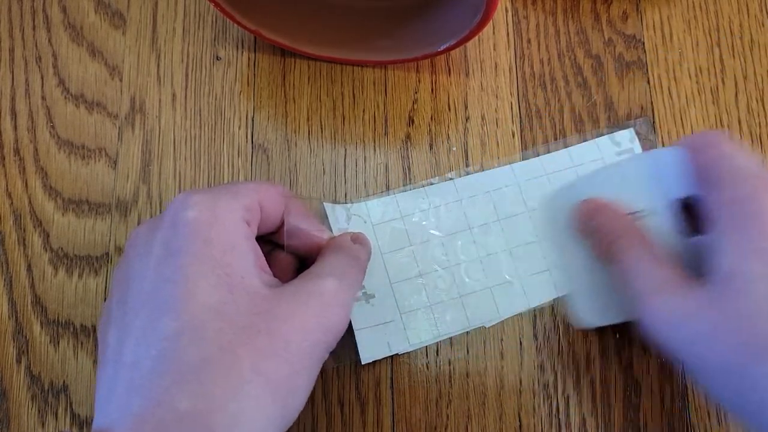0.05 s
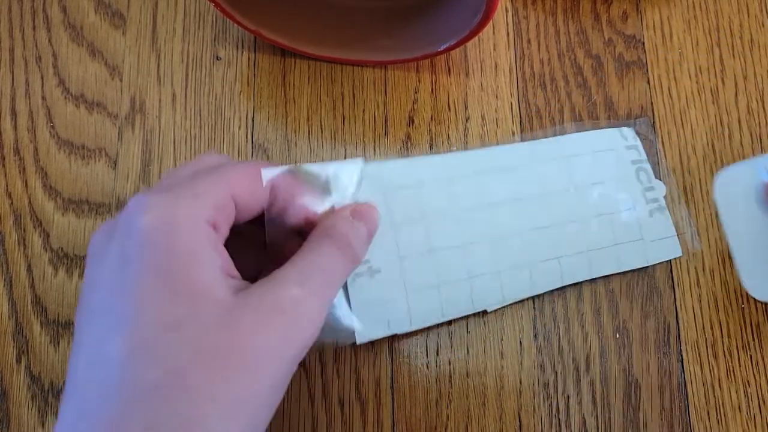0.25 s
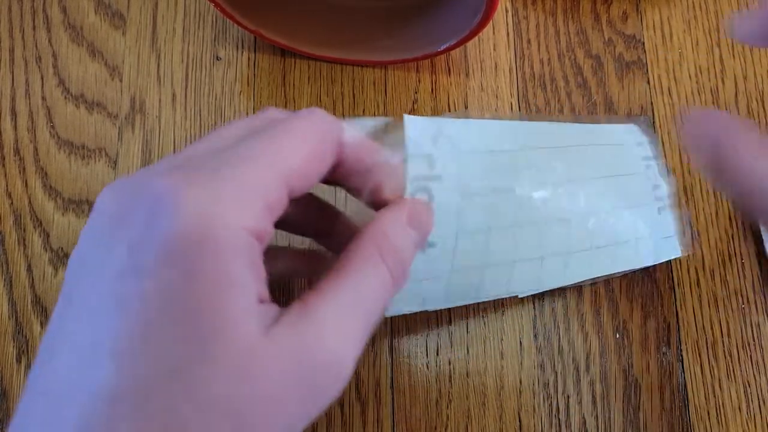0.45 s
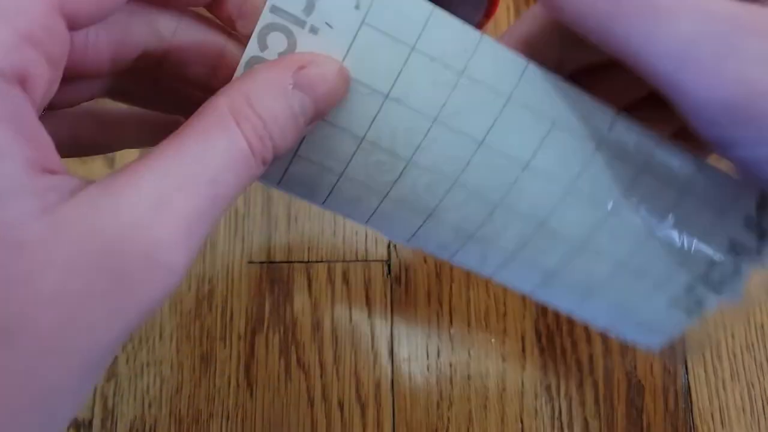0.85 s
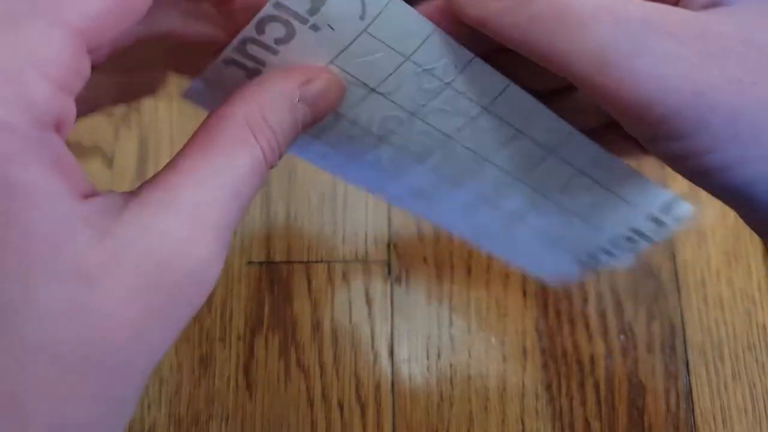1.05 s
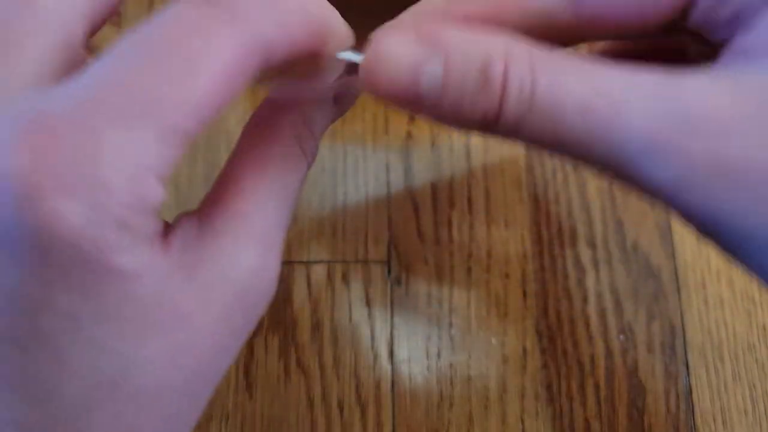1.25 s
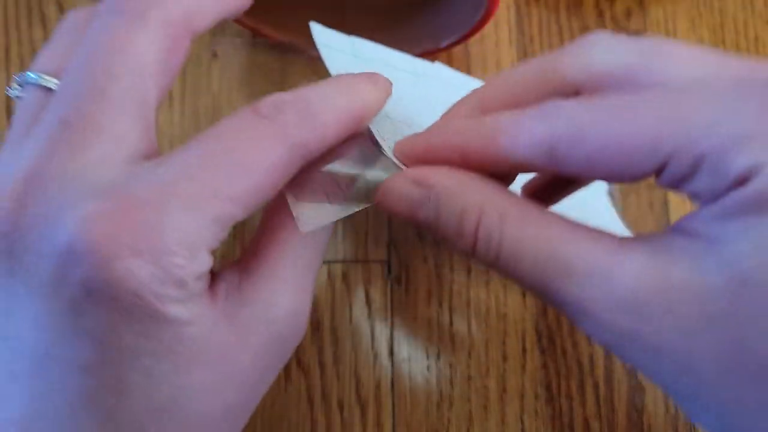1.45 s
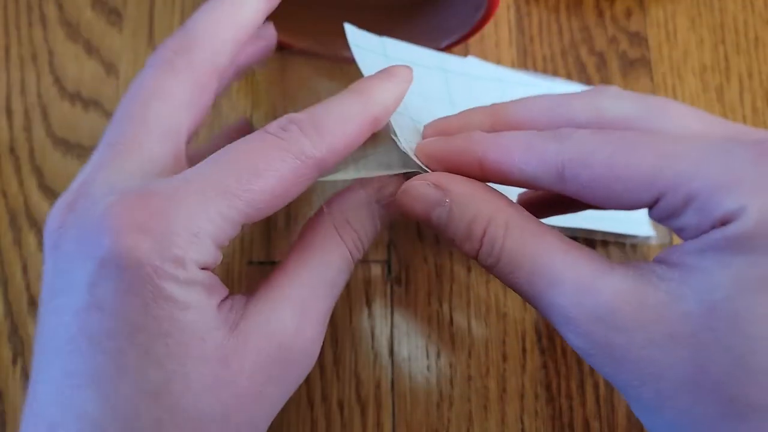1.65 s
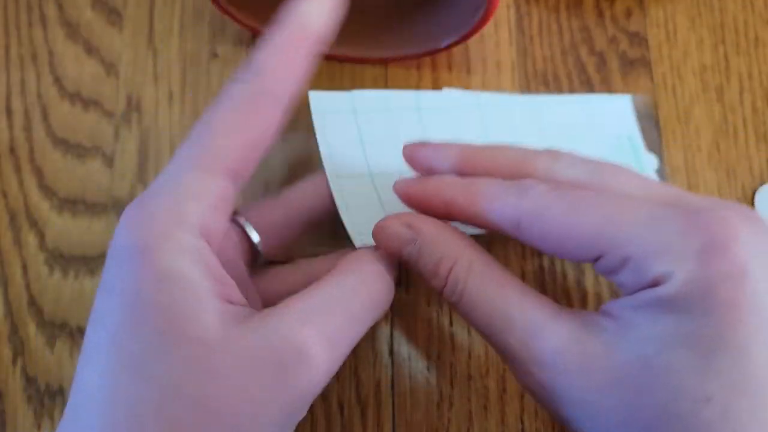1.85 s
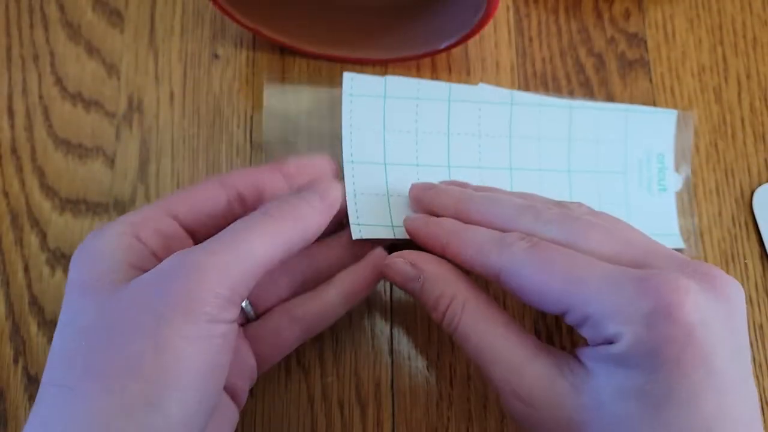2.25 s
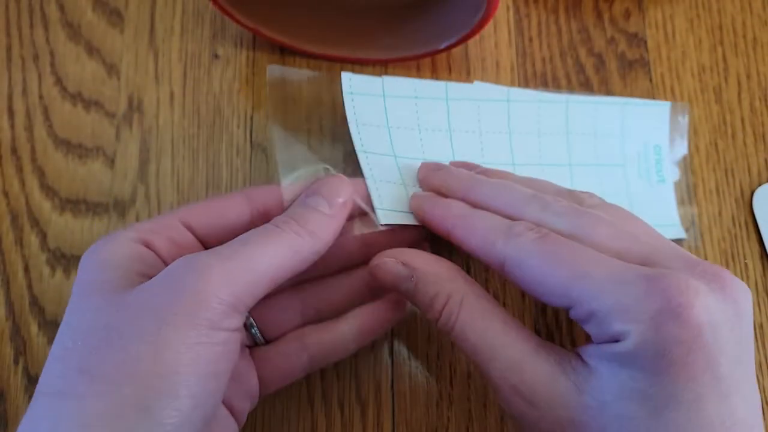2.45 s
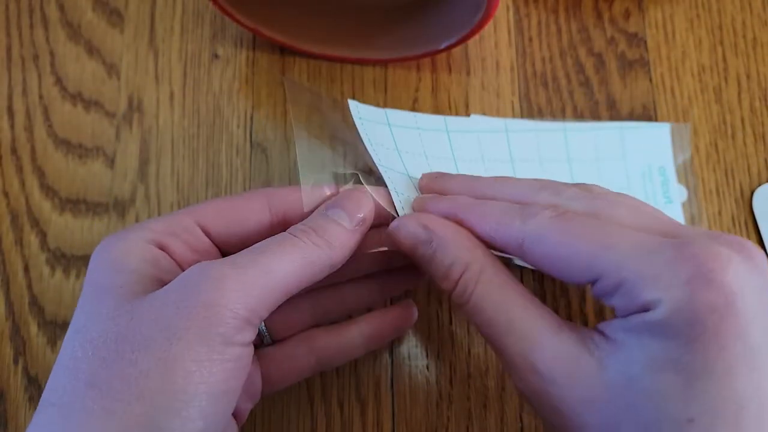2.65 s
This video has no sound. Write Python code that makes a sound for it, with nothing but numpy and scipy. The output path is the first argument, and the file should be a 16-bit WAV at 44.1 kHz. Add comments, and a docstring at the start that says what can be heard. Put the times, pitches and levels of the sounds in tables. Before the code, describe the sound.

Sticky tape and its stiff backing crinkle close by in a quiet room. A plastic scraper rubs for the first half second, with a light knock on wood near 0.4 seconds and the sharpest snaps around 0.3 and 0.5. Softer rustling follows until 1.2, then a lull. Crackling picks up from 1.7 to 2 seconds with a faint knock, and a few small clicks come around 2.4.

```python
"""Rubbing down tape and lifting its backing sheet.

A plastic scraper rubs sticky tape down on a wooden table, sticking and slipping, and is set aside
with a knock that rings the wood. Hands lift the stiff backing sheet, which buckles and snaps,
turn it over and pick the tape away with a rustle.
Close stereo microphone in a small, quiet room with a low hum."""
import sys
import numpy as np
from scipy import signal
from scipy.fft import rfft, irfft
from scipy.io import wavfile
from scipy.ndimage import uniform_filter1d

SR = 44100
rng = np.random.default_rng(int(sys.argv[2]) if len(sys.argv) > 2 else 0)


def dump_mix(stems):
    """Bounce the given channels to the path in sys.argv[1] as a 16-bit WAV at rate SR."""
    frames = np.atleast_2d(stems).T  # one column per channel
    limited = np.clip(frames, -1, 1)  # hard clip at full scale
    pcm = np.round(limited * 32767).astype(np.int16)
    wavfile.write(sys.argv[1], SR, pcm)


N = 119070

# room air spectrum: freq_hz, relative_db
AIR_SPECTRUM = [(20, -6), (45, -5.5), (70, -2.5), (130, -10.5), (300, -21.5), (1000, -30.5), (2000, -31),
                (3500, -21), (5500, -31), (7300, -23), (9000, -44), (12000, -32.5), (16000, -37.5)]
# room decay: freq_hz, t60_s
ROOM_DECAY = [(200, 1), (1000, 0.25), (3000, 0.55), (5500, 0.23), (16000, 0.29)]
# where the hands work: time_s, left_late_ms, left_minus_right_db
HAND_PATH = [(0, 0.099, 0), (.33, 0.18, -1.5), (0.499, 0.073, 1.4), (1.151, 0.1, 2), (1.45, -.11, 2.5),
             (2.003, -.11, 1.8), (2.451, -0.12, 2)]
# knocks on the table: start_s, pitch_ratio, wood_relative_db, thump_db
TABLE_KNOCKS = [(0.3163, 1, -51, -49), (0.414, 1.07, -25, -72), (0.453, 1, -37, -58), (0.509, 1, -35, -43),
                (0.537, .95, -28, -77), (0.607, 1, -36, -68), (0.691, .9, -42, -50),
                (0.8, 0.795, -42, -56.5), (0.914, 1.12, -42.5, -65), (1.036, 1, -57, -61),
                (1.154, .8, -47, -62), (1.873, 1.05, -29, -77), (1.936, 0.99, -37.5, -80)]
# table top modes: pitch_hz, relative_db, t60_s
TABLE_MODES = [(293.3, -1, 0.093), (324.5, -5.5, 0.07), (530, -24, 0.065), (660, -13.5, 0.026),
               (1005, -20.5, 0.098)]
# fingers on the sheet, tape peeling: start_s, length_s, swell_db, bass_db, middle_db, treble_db
RUSTLE_STROKES = [(0.172, 0.06, -1, -57.5, -60, -47.5), (0.495, 0.047, -14, -47.5, -32.5, -31.5),
                  (0.752, 0.051, -4.5, -58.5, -47, -56.5), (0.8, 0.043, 9, -62, -52, -55),
                  (0.85, 0.053, 9, -71, -57, -59.5), (0.962, 0.069, 4, -61, -44.5, -51.5),
                  (1.068, 0.012, 3, -65, -48.5, -57), (1.088, 0.057, 6, -79, -60.5, -55.5),
                  (1.135, 0.017, 16, -60, -45.5, -47), (1.165, 0.091, -5, -98.5, -76, -63),
                  (1.415, 0.14, -6.5, -68, -61.5, -63), (1.512, 0.207, -8, -70.5, -61, -66),
                  (1.743, 0.032, -2, -48, -38.5, -44), (1.778, 0.033, 5, -57.5, -46, -56.5),
                  (1.863, 0.042, -17.5, -46.5, -38, -43), (1.916, 0.028, -3, -39, -36.5, -52),
                  (1.934, 0.021, -1.5, -41.5, -35, -44), (1.957, 0.06, 10.5, -55.5, -41, -47.5),
                  (2.03, 0.12, -18.5, -75.5, -59.5, -99), (2.34, 0.13, -10, -67, -57, -64.5),
                  (2.56, 0.12, 0.5, -78, -70.5, -74.5)]
# rustle spectrum: freq_hz, relative_db
RUSTLE_SPECTRUM = [(60, -18.5), (170, -30), (290, -14), (420, -11), (650, -12.5), (1100, 2.5), (2000, 2),
                   (3200, 5.5), (4600, 6), (5800, -6.5), (7400, -11), (9000, -20.5), (12000, -15),
                   (16000, -27)]
# hollow resonances of the flexing sheet: pitch_hz, width_hz, boost_db
SHEET_MODES = [(285, 36, 7), (530, 73, 10.5), (1040, 170, 7.5), (1900, 300, 10.5), (2810, 360, 5.5)]
# scraper and hands on sheet and table: start_s, length_s, swell_db, bass_db, middle_db, treble_db
SCRAPE_STROKES = [(0, 0.077, 10.5, -54.5, -49.5, -55.5), (.06, 0.038, 5.5, -50.5, -40, -54.5),
                  (.095, 0.073, -3, -48, -43.5, -53.5), (.17, 0.067, 2.5, -51, -44, -59),
                  (.25, 0.048, 2, -52.5, -50, -61.5), (.284, 0.065, -3, -64.5, -44.5, -50.5),
                  (.322, 0.076, -10.5, -39.5, -36.5, -50), (.389, 0.15, 11, -44, -45.5, -62),
                  (.91, 0.054, 16, -76, -58, -64.5)]
# scrape spectrum: freq_hz, relative_db
SCRAPE_SPECTRUM = [(60, -7.5), (170, -4), (330, 4), (800, -2), (2000, -13), (4500, -10.5), (7000, -7.5),
                   (11000, -11), (16000, -13.5)]
# scraper resonances: pitch_hz, width_hz, boost_db
SCRAPER_MODES = [(364.6, 23, 2.5), (574, 43, 4), (753, 37, 6.5), (1057, 90, 12), (2840, 340, 6),
                 (3230, 900, 9), (5560, 500, 4), (12400, 1200, 5.5)]
# snaps of sheet, tape and scraper edge:
# start_s, length_s, low_ring_hz, low_boost_db, high_ring_hz, high_boost_db, bass_db, middle_db, treble_db
SNAP_EVENTS = [(0.0775, 0.0024, 1100, 6, 3200, -3, -42, -35.5, -45),
               (0.1694, 0.0047, 3300, 19, 12900, 8, -58, -39.5, -33.5),
               (0.2045, 0.003, 480, 11, 684, 15, -33.5, -40.5, -45),
               (0.219, 0.0015, 650, 23, 11600, 6, -38, -41, -36),
               (0.3174, 0.0022, 3070, 4, 5080, 16.5, -33.5, -22.5, -24.5),
               (0.3205, 0.0033, 990, 10.5, 4800, 16, -34.5, -30.5, -28),
               (0.3465, 0.0046, 706, 15, 3020, 11.5, -46, -28, -36),
               (0.4715, 0.0016, 1370, 16.5, 2800, 8.5, -44, -24, -37.5),
               (0.4744, 0.0023, 336, 16, 1400, 7, -40.5, -25, -25.5),
               (0.4787, 0.0024, 1390, 2, 2950, 5, -45, -22.5, -23.5),
               (0.4991, 0.0021, 2950, 18, 4400, 9.5, -31, -18.5, -21),
               (0.5051, 0.0026, 1270, 10.5, 1960, 9.5, -35.5, -22.5, -27.5),
               (0.536, 0.001, 3120, 2, 4340, 8, -37, -33, -43),
               (0.772, 0.0052, 1800, 7, 2810, 15, -54, -38.5, -56),
               (0.795, 0.0021, 3260, 6.5, 6900, 14, -46, -34.5, -36.5),
               (0.8388, 0.0048, 1760, 14, 2790, 15, -74, -35.5, -50.5),
               (0.968, 0.0063, 1050, 7.5, 3220, 13, -53.5, -40.5, -66),
               (1.0262, 0.0037, 1360, 17, 2200, -1, -56.5, -43, -47),
               (1.083, 0.0027, 1070, 17, 2130, -4, -66, -43.5, -64),
               (1.156, 0.0021, 1600, 10, 4100, 8.5, -49.5, -35.5, -41),
               (1.679, 0.00072, 1080, 17, 1700, 3, -62, -45.5, -54),
               (1.7427, 0.0038, 1450, 9, 6350, 8.5, -70, -41.5, -38.5),
               (1.753, 0.001, 1511, 14, 3270, 4, -62, -34.5, -40),
               (1.764, 0.0027, 1020, 13, 1500, 8.5, -36.5, -32, -48.5),
               (1.781, 0.00086, 1400, 3, 4370, -3, -41.5, -34.5, -67),
               (1.8077, 0.0019, 1800, 15, 2690, 7, -60, -36, -58),
               (1.868, 0.002, 1070, 10, 1380, 11, -47, -28.5, -37.5),
               (1.8722, 0.0013, 3520, 14.5, 4580, 15, -46, -26.5, -27.5),
               (1.943, 0.0067, 307, 17, 1630, 14.5, -37, -30.5, -57),
               (2.0035, 0.0013, 1550, 9.5, 2670, 8, -49, -28, -30.5),
               (2.0124, 0.0022, 1240, 6, 2600, 5, -47, -27, -57),
               (2.243, 0.0016, 1380, 16, 1920, 15, -65.5, -55.5, -81.5),
               (2.3562, 0.00057, 1787, 12, 3370, 9.5, -55, -31.5, -44),
               (2.4208, 0.0014, 896, 11.5, 1220, 18.5, -35, -27, -37),
               (2.44, 0.0018, 1060, 9, 4300, -7, -53, -51, -54),
               (2.453, 0.0023, 1110, 23, 2950, 3, -58, -45.5, -82),
               (2.643, 0.00088, 3140, 3.5, 7130, 7, -87, -52, -48.5)]
# snap spectrum: freq_hz, relative_db
SNAP_SPECTRUM = [(60, -27), (250, -13.5), (600, -2.5), (1300, 4.5), (3000, 6), (5000, 5.5), (8500, -5),
                 (12000, -5), (16000, -12)]

BASS_EDGE_HZ, TREBLE_EDGE_HZ = 900, 6000
SNAP_SPREAD, RUB_SPREAD = 0.7, 0.93  # unshared amplitude per channel


def undb(db):
    """Decibels to gain."""
    return 10 ** (np.asarray(db) / 20)


def unit(x):
    """Scale to rms 1."""
    return x / np.sqrt(np.mean(x ** 2) + 1e-20)


def freqs_hz(x):
    """Frequency axis of x."""
    return np.arange(x.shape[-1] // 2 + 1) * SR / x.shape[-1] + 1e-3


def lookup(freq_hz, table):
    """Interpolate a table over log frequency."""
    hz, value = np.array(table).T
    return np.interp(np.log(freq_hz), np.log(hz), value)


def causal_filter(x, gain):
    """Minimum-phase filter with the given gain per frequency."""
    size = x.shape[-1]
    cepstrum = irfft(np.log(gain + 1e-5), size)
    cepstrum[1:size // 2] *= 2
    cepstrum[size // 2 + 1:] = 0
    return irfft(rfft(x) * np.exp(rfft(cepstrum)), size)


def stereo_noise(size, spread):
    """White noise: one shared part plus one per side."""
    noise = rng.standard_normal((3, size))
    return np.sqrt(1 - spread ** 2) * noise[0] + spread * noise[1:]


def resonant_body(x, spectrum, modes, mode_gap_hz, levels_db, length_s, ripple_db=4.5, smooth_hz=500):
    """Flatten x, ring it through many uneven resonances, set bass, middle and treble rms over length_s."""
    f_hz, size = freqs_hz(x), x.shape[-1]
    ripple = undb(ripple_db * np.interp(f_hz / mode_gap_hz, np.arange(1024), rng.standard_normal(1024)))
    power = 2 * np.mean(abs(rfft(x)) ** 2, axis=0) / size / (length_s * SR)
    smoothed = uniform_filter1d(power * ripple ** 2, int(smooth_hz * size / SR))
    gain = undb(lookup(f_hz, spectrum)) * ripple / np.sqrt(smoothed / smoothed.mean() + 1e-9)
    for pitch_hz, width_hz, boost_db in modes:
        gain = gain * undb(boost_db / (1 + (2 * (f_hz - pitch_hz) / width_hz) ** 2))
    above_bass, treble = (1 / (1 + (hz / f_hz) ** 8) for hz in (BASS_EDGE_HZ, TREBLE_EDGE_HZ))
    bands = np.array([1 - above_bass, above_bass - treble, treble])
    for _ in range(2):  # bands overlap
        band_db = 10 * np.log10(bands @ (power * gain ** 2) + 1e-20)
        gain = gain * undb((np.array(levels_db) - band_db) @ bands)
    return causal_filter(x, gain)


def add_at_hands(out, x, start_s):
    """Fade the end of x and mix it in with the delay and pan of the hands' position."""
    times_s, lags_ms, pans_db = np.array(HAND_PATH).T
    lag_s = np.interp(start_s, times_s, lags_ms) / 1000
    pan_db = np.interp(start_s, times_s, pans_db)
    faded = x * np.clip(np.linspace(4, -1, x.shape[1]), 0, 1)
    for channel, side in enumerate((.5, -.5)):
        at = int(round((start_s + side * lag_s) * SR)) + np.arange(x.shape[1])
        inside = (at >= 0) & (at < N)
        out[channel, at[inside]] += faded[channel, inside] * undb(side * pan_db)


def room_air(level_db=-65.5):
    """Steady, wide, mostly low noise."""
    noise = stereo_noise(N, spread=0.93)
    air = causal_filter(noise, undb(lookup(freqs_hz(noise), AIR_SPECTRUM)))
    return undb(level_db) * unit(air)


def hum(pitch_hz=84.4, level_db=-67, start_s=1.35, end_s=2.65, fade_s=0.039):
    """A low tone fades in and out in the second half."""
    t = np.arange(N) / SR
    envelope = np.clip(np.minimum(t - start_s, end_s - t) / fade_s, 0, 1)
    return undb(level_db) * envelope * unit(np.sin(2 * np.pi * pitch_hz * t))


def room_tail(x, level_db=-17, build_s=0.0054, size=32768):
    """Diffuse reverberation; each octave decays at its own rate."""
    t = np.arange(size) / SR
    noise = rng.standard_normal((2, size))
    f_hz, tail = freqs_hz(noise), 0
    for octave_hz in 125 * 2. ** np.arange(8):
        band = irfft(rfft(noise) * np.maximum(1 - abs(np.log2(f_hz / octave_hz)), 0))
        tail = tail + band * undb(-60 * t / lookup(octave_hz, ROOM_DECAY))
    tail = unit(tail * np.minimum(t / build_s, 1) ** 2) / np.sqrt(size)
    return undb(level_db) * signal.fftconvolve(x, tail, axes=1)[:, :N]


def reflections(x, delays_s=(0.001377, 0.0034), level_db=-17):
    """Bounces off the table top and nearby things, one per channel."""
    delayed = [np.pad(side, (int(delay_s * SR), 0))[:N] for side, delay_s in zip(x, delays_s)]
    return undb(level_db) * np.array(delayed)


def knocks(thump_hz=74, thump_decay_s=0.039, contact_s=0.0017, detune=0.042, phase_rad=0.31, size=16384):
    """Scraper and hands bump the table: wood modes, phased differently per channel, over a deep thump."""
    out, t = np.zeros((2, N)), np.arange(size) / SR
    attack = 1 - np.exp(-t / contact_s)
    for start_s, pitch_ratio, wood_relative_db, thump_db in TABLE_KNOCKS:
        wood = 0
        for mode_hz, mode_db, t60_s in TABLE_MODES:
            pitch_hz = mode_hz * pitch_ratio * (1 + detune * rng.standard_normal())
            phase = 2 * np.pi * pitch_hz * t + phase_rad * rng.standard_normal((2, 1))
            wood = wood + undb(mode_db - 60 * t / t60_s) * np.sin(phase)
        deep_hz = thump_hz * (1 + 0.11 * rng.standard_normal())
        thump = np.exp(-t / thump_decay_s) * np.sin(2 * np.pi * deep_hz * t)
        add_at_hands(out, (undb(wood_relative_db) * wood / 2 + undb(thump_db) * thump) * attack, start_s)
    return out


def stick_slip(strokes, spectrum, modes, slips_per_s, scatter_db, slip_s, hiss_db, attack_share,
               release_s):
    """Friction: tiny uneven bursts over fine hiss, under a pressure that swells and wavers."""
    size, lead_s = 20480, .03
    waver_per_s, waver_db = 120, 3.0
    mode_gap_hz, detune = 69.06, 0.019  # whole sheet: dense modes that shift as it bends
    out, t = np.zeros((2, N)), np.arange(size) / SR - lead_s
    for start_s, length_s, swell_db, *levels_db in strokes:
        slipping = rng.random(size) < slips_per_s / SR
        slips = slipping * undb(scatter_db * np.minimum(rng.standard_normal(size), 2))
        bursts = unit(signal.lfilter([1], [1, -np.exp(-1 / (slip_s * SR))], slips))
        waver = np.interp(t * waver_per_s, np.arange(256), rng.standard_normal(256))
        attack = np.exp(np.minimum(t / (attack_share * length_s) - 1, 0))
        release = np.exp(-np.maximum(t - length_s, 0) / release_s)
        pressure = attack * release * undb(swell_db * np.clip(t / length_s, 0, 1) + waver_db * waver)
        rub = stereo_noise(size, RUB_SPREAD) * (bursts + undb(hiss_db)) * pressure
        shifted = [(hz * (1 + detune * rng.standard_normal()), width_hz, db) for hz, width_hz, db in modes]
        stroke = resonant_body(rub, spectrum, shifted, mode_gap_hz, levels_db, length_s)
        add_at_hands(out, stroke, start_s - lead_s)
    return out


def rustles():
    """Fingers slide and tape peels: sparse slips ring the flexing sheet."""
    return stick_slip(RUSTLE_STROKES, RUSTLE_SPECTRUM, SHEET_MODES, slips_per_s=420, scatter_db=3.5,
                      slip_s=0.00094, hiss_db=0.5, attack_share=0.21, release_s=0.013)


def scrapes():
    """Scraper and hands slide on sheet and table: dense slips and strong hiss ring the plastic."""
    return stick_slip(SCRAPE_STROKES, SCRAPE_SPECTRUM, SCRAPER_MODES, slips_per_s=1000, scatter_db=6,
                      slip_s=0.0006, hiss_db=11.5, attack_share=0.056, release_s=0.0099)


def snaps(lead_in_s=0.0023, lead_in_db=-22, decay_s=0.00036, flutter_s=0.0064, flutter_db=-16):
    """A faint, brief rise leads into quick cracks; the sheet rings at two pitches and flutters."""
    size, window_s, ring_q = 8192, .005, 4.87
    mode_gap_hz = 212.2  # small crease: few modes
    out, t = np.zeros((2, N)), np.arange(size) / SR - window_s
    lead_in = undb(lead_in_db) * np.exp(-abs(t) / lead_in_s)
    flutter_envelope = undb(flutter_db) * (t > 0) * np.exp(-abs(t) / flutter_s)
    for start_s, length_s, low_hz, low_db, high_hz, high_db, *levels_db in SNAP_EVENTS:
        buckle = np.exp(-np.maximum(t - length_s, 0) / decay_s - 0.23 * np.clip(t / length_s, 0, 1))
        cracks = stereo_noise(size, SNAP_SPREAD) * np.where(t < 0, lead_in, buckle)
        flutter = stereo_noise(size, RUB_SPREAD) * flutter_envelope
        rings = [(low_hz, low_hz / ring_q, low_db), (high_hz, high_hz / ring_q, high_db)]
        snap = resonant_body(cracks + flutter, SNAP_SPECTRUM, rings, mode_gap_hz, levels_db, window_s)
        add_at_hands(out, snap, start_s - window_s)
    return out


def scene():
    """Scraper, sheet and table in the room."""
    direct = scrapes() + rustles() + snaps() + knocks()
    return direct + reflections(direct) + room_tail(direct) + room_air() + hum()


def record(dry):
    """The microphone thins the deepest bass; the recorder cuts the top."""
    low_cut_hz, high_cut_hz = 42, 15900
    thinned = signal.sosfilt(signal.butter(3, low_cut_hz, "high", fs=SR, output="sos"), dry)
    return signal.sosfilt(signal.ellip(10, .2, 80, high_cut_hz, fs=SR, output="sos"), thinned)


dry = scene()
out = record(dry)
dump_mix(out)
```